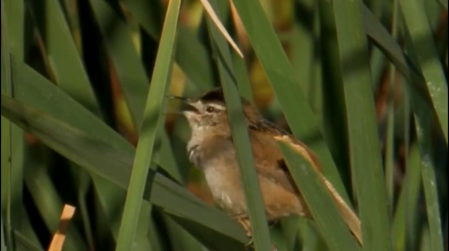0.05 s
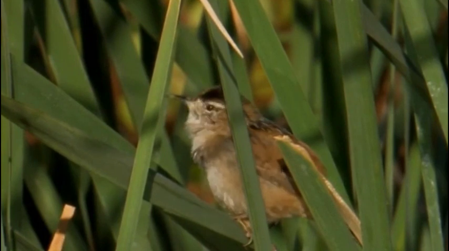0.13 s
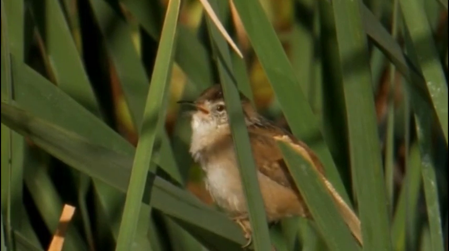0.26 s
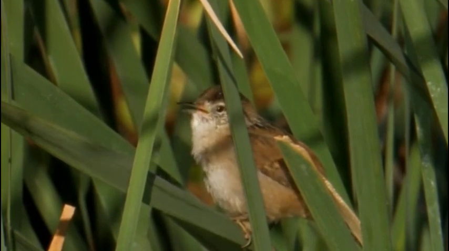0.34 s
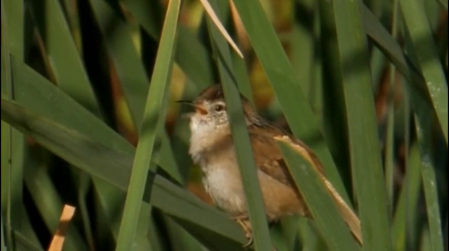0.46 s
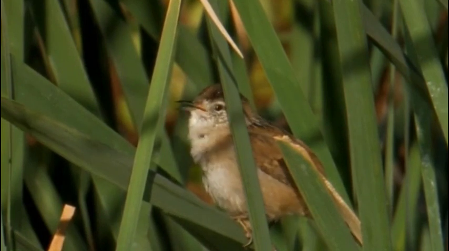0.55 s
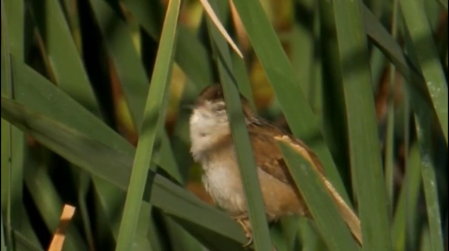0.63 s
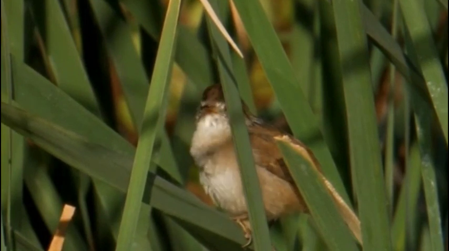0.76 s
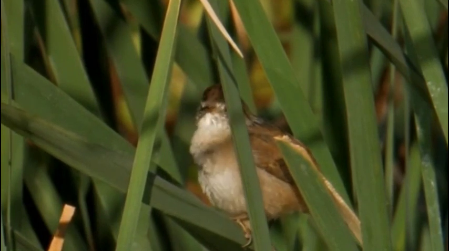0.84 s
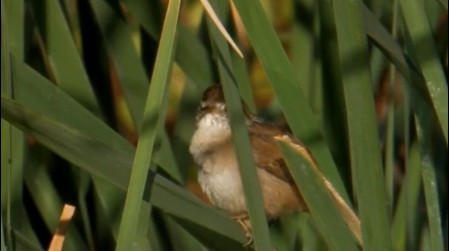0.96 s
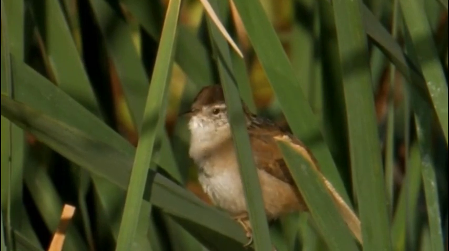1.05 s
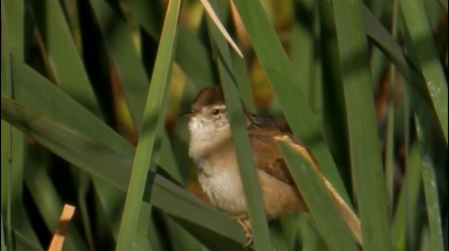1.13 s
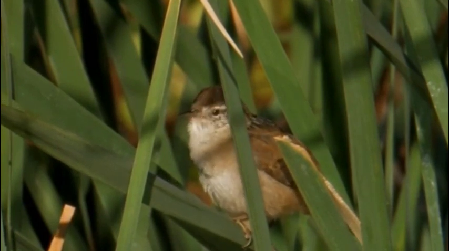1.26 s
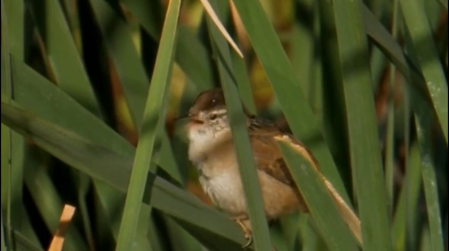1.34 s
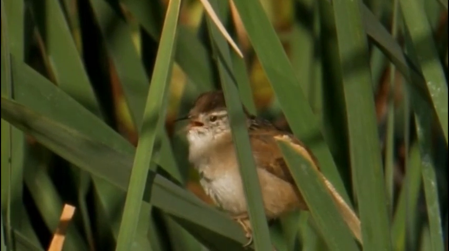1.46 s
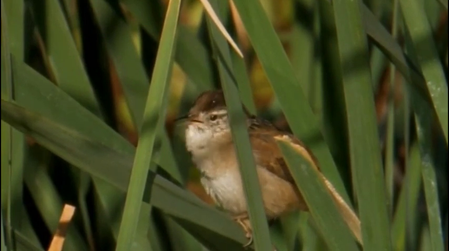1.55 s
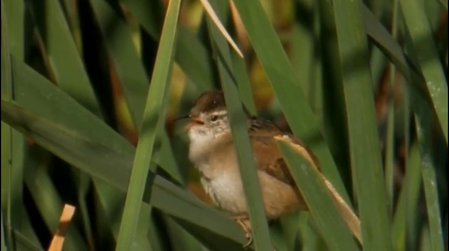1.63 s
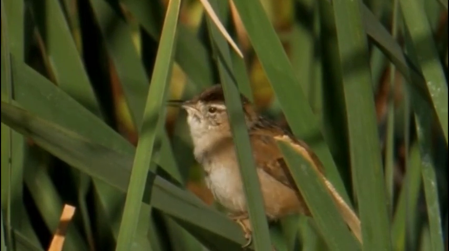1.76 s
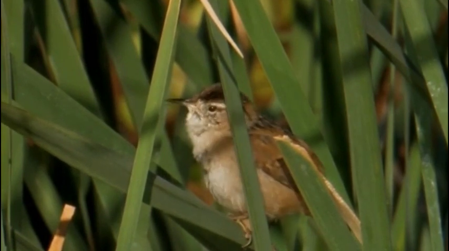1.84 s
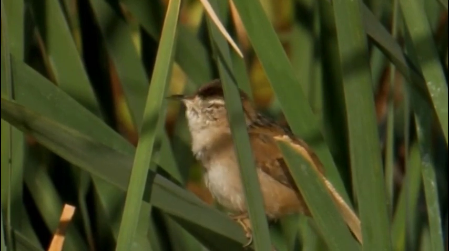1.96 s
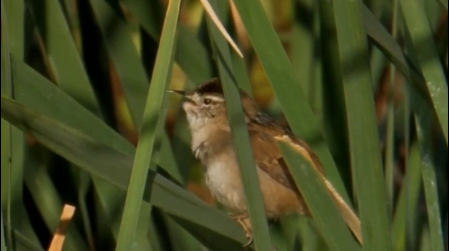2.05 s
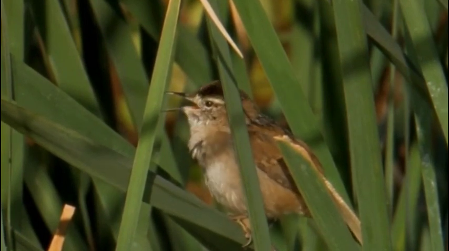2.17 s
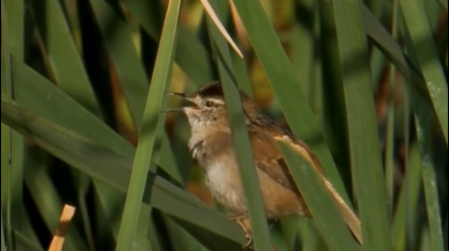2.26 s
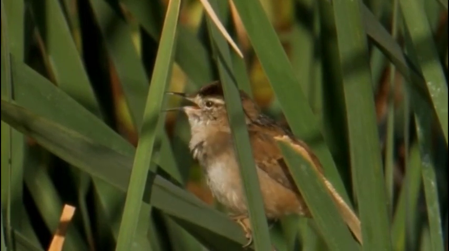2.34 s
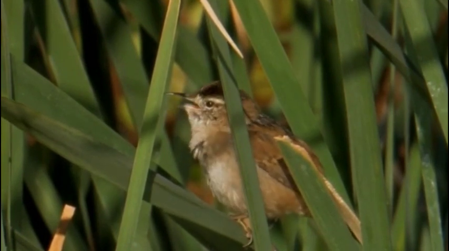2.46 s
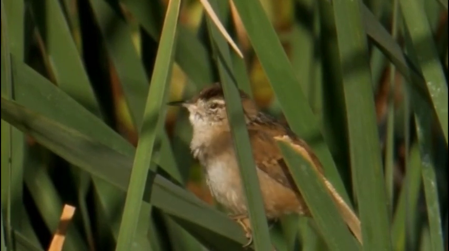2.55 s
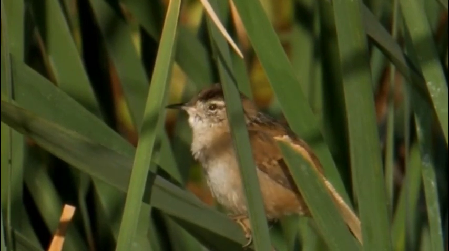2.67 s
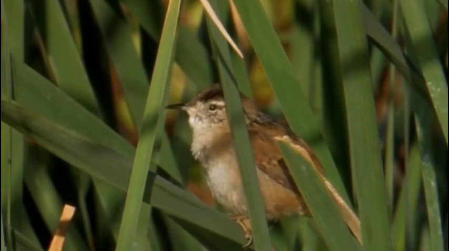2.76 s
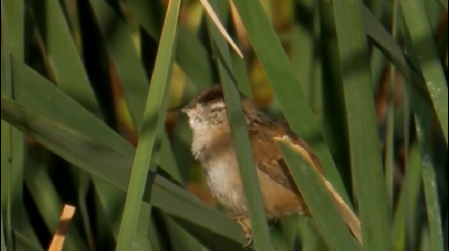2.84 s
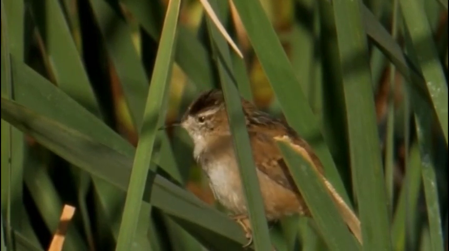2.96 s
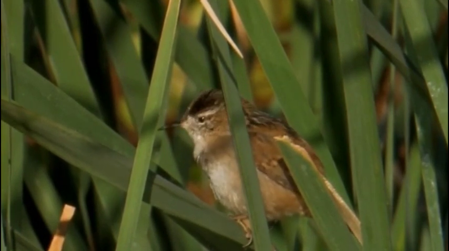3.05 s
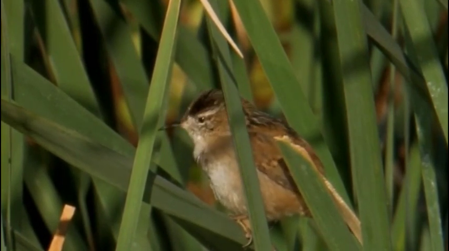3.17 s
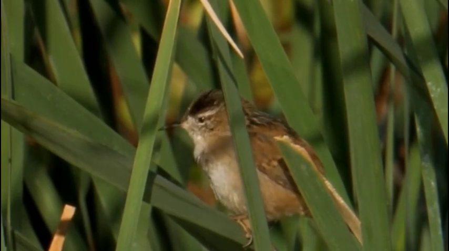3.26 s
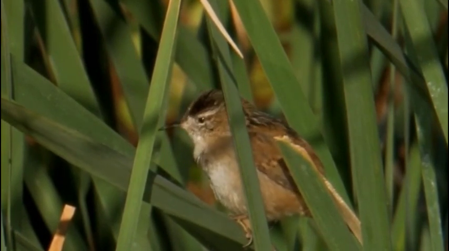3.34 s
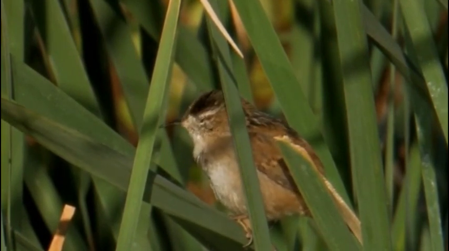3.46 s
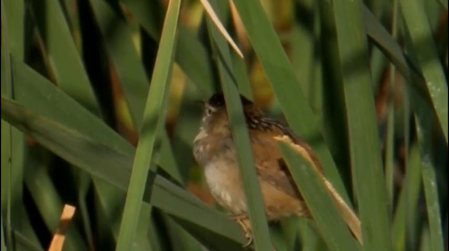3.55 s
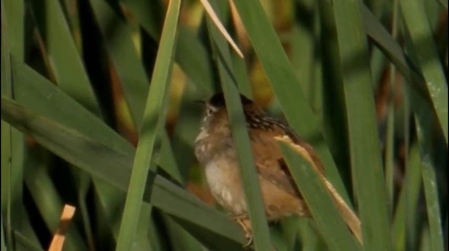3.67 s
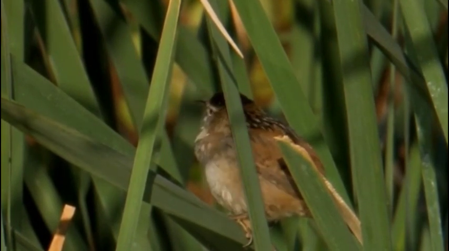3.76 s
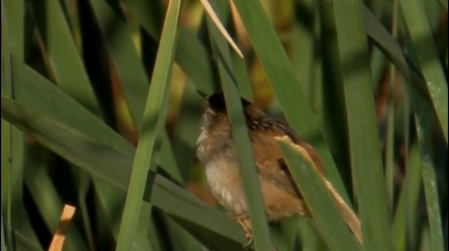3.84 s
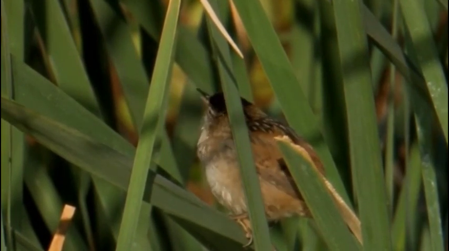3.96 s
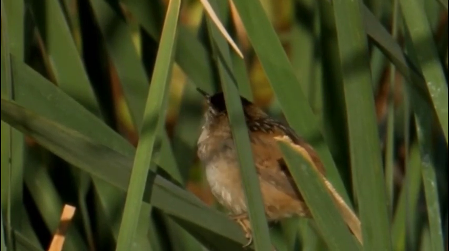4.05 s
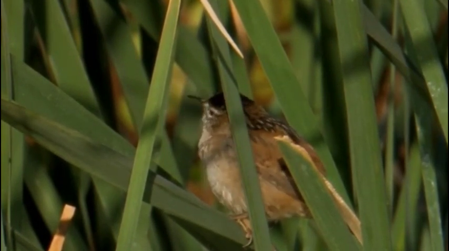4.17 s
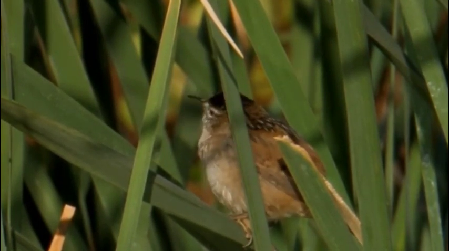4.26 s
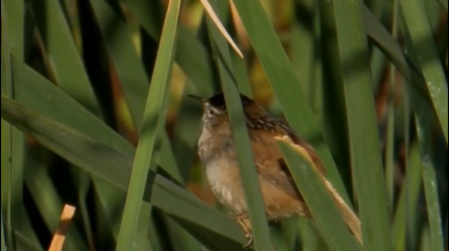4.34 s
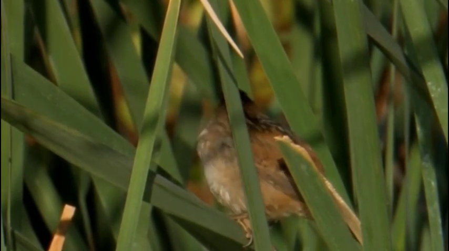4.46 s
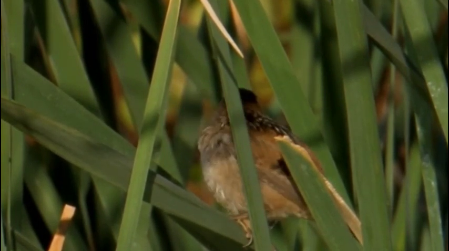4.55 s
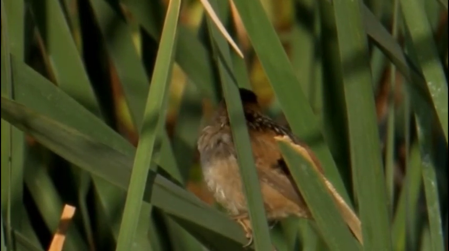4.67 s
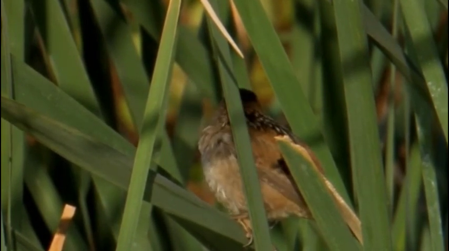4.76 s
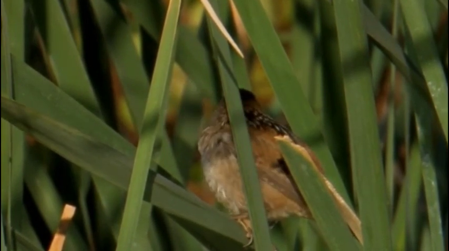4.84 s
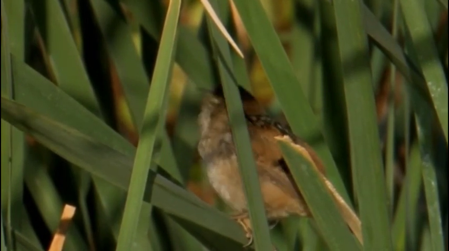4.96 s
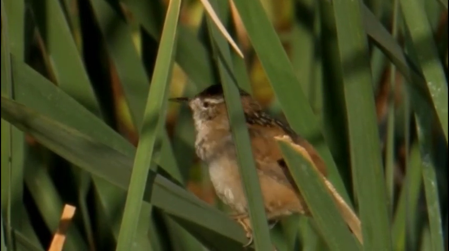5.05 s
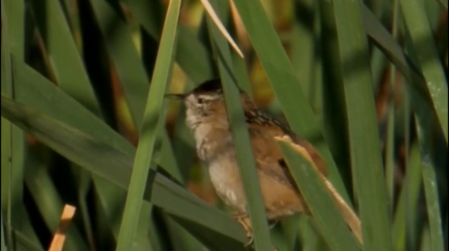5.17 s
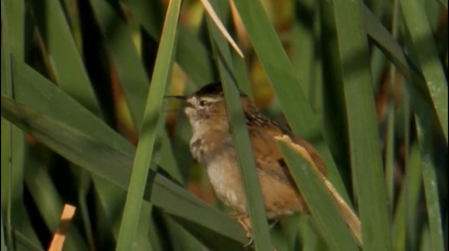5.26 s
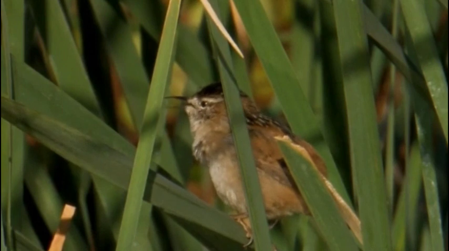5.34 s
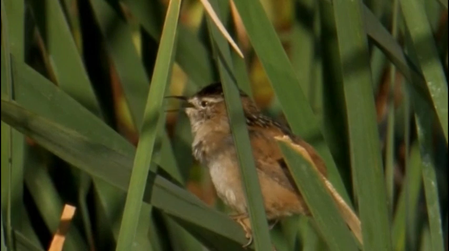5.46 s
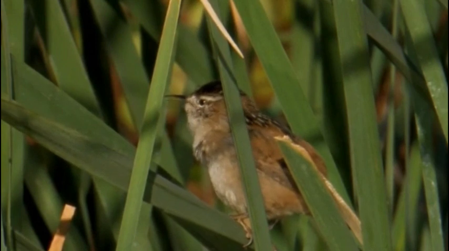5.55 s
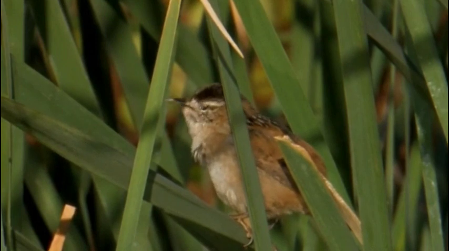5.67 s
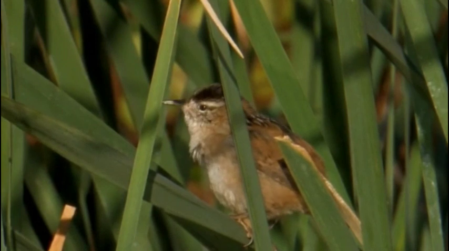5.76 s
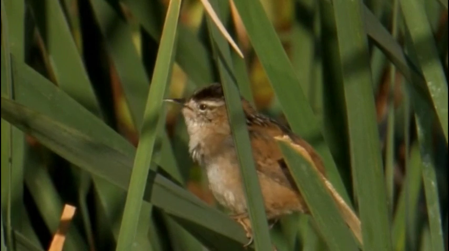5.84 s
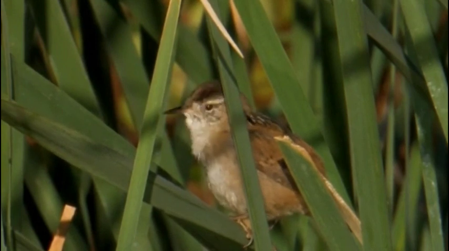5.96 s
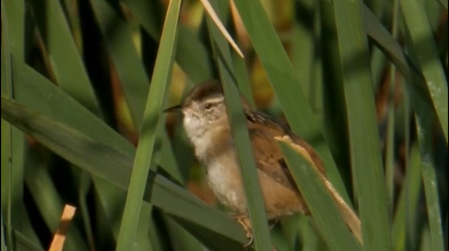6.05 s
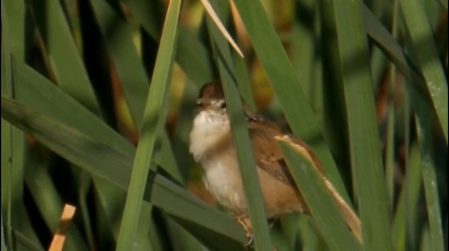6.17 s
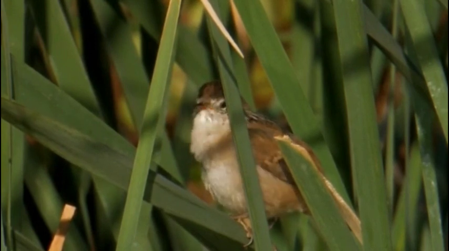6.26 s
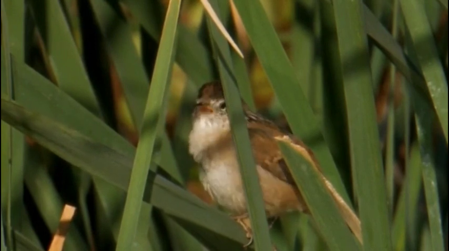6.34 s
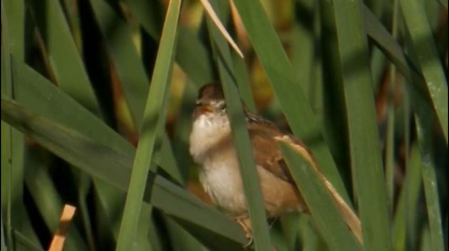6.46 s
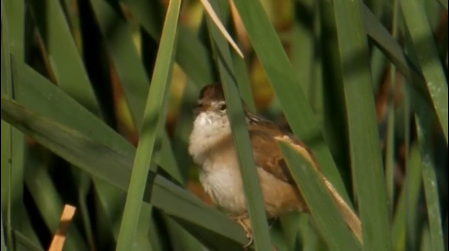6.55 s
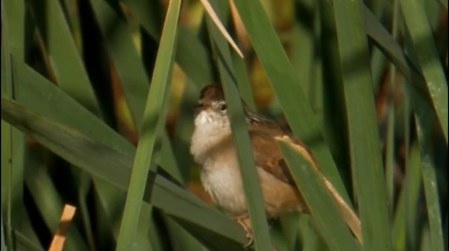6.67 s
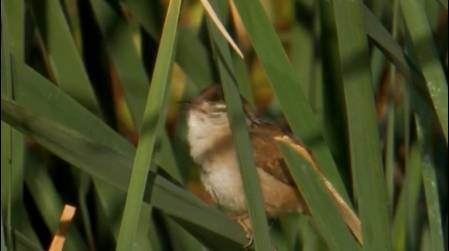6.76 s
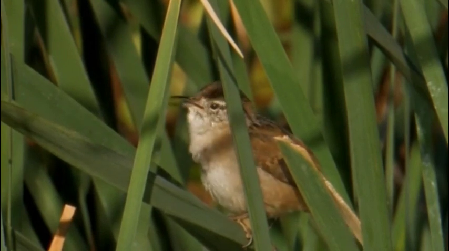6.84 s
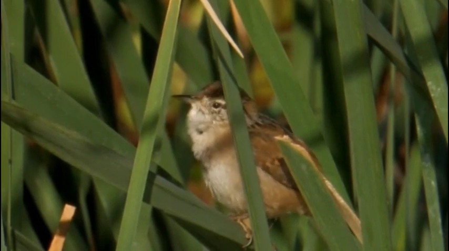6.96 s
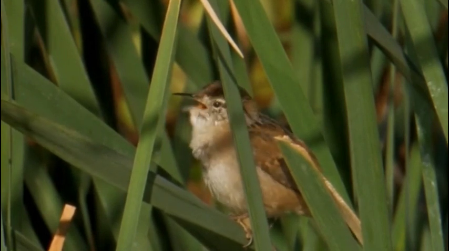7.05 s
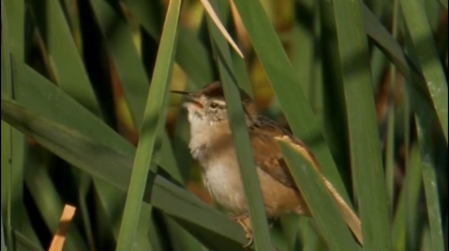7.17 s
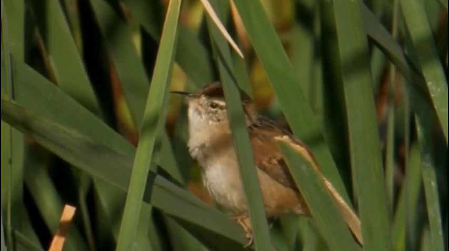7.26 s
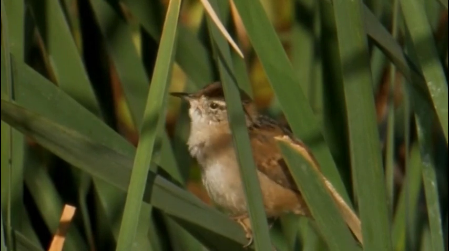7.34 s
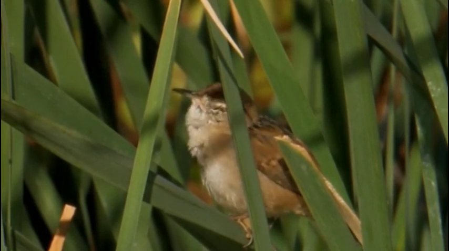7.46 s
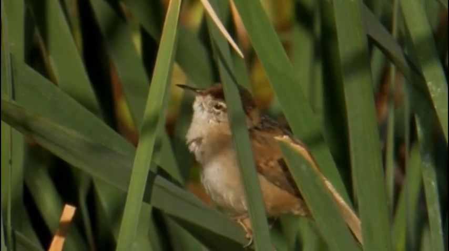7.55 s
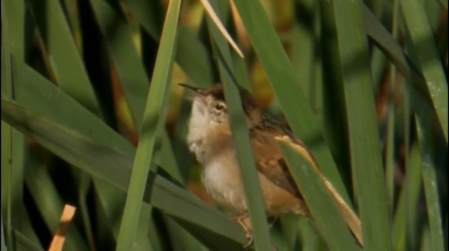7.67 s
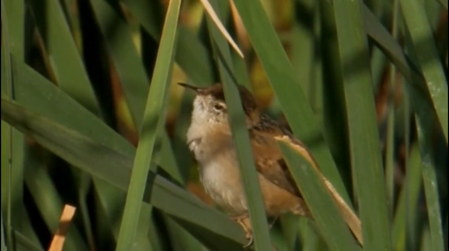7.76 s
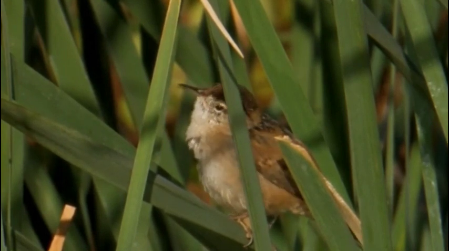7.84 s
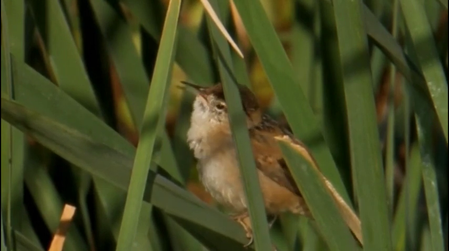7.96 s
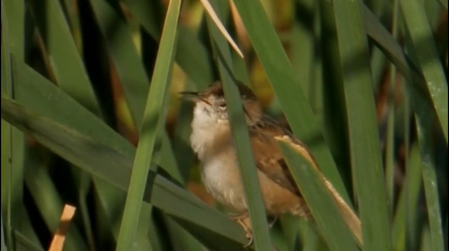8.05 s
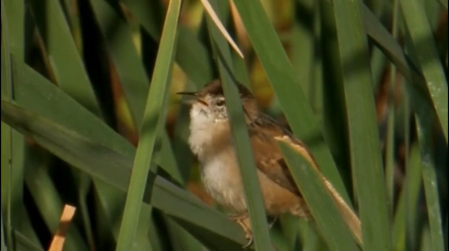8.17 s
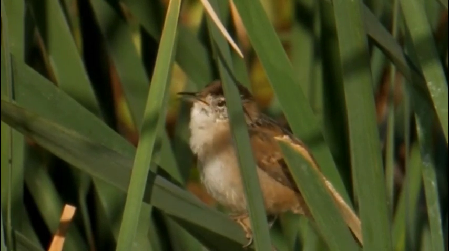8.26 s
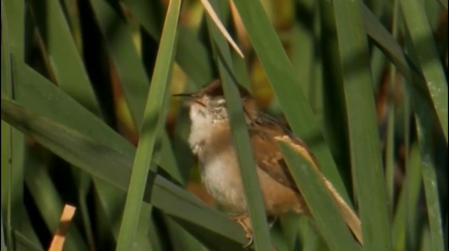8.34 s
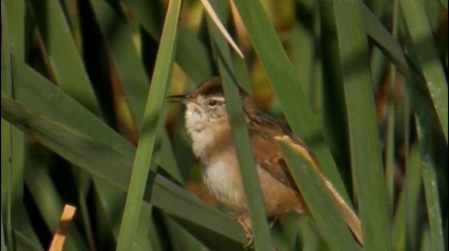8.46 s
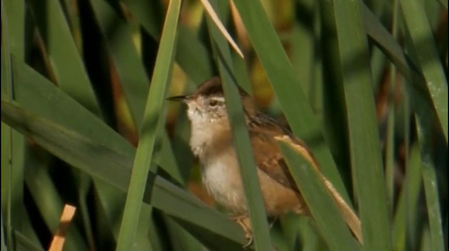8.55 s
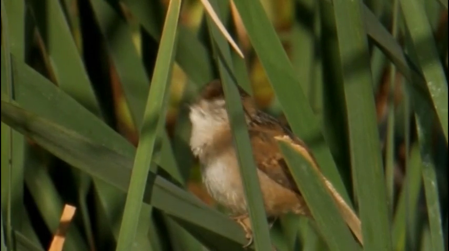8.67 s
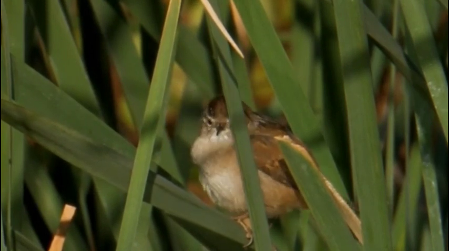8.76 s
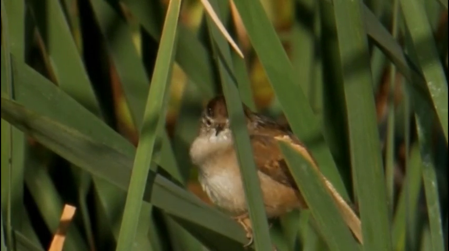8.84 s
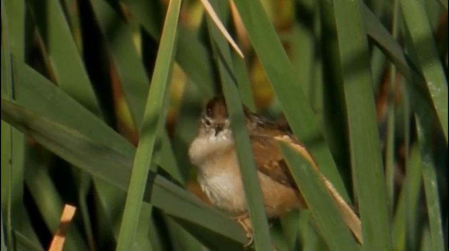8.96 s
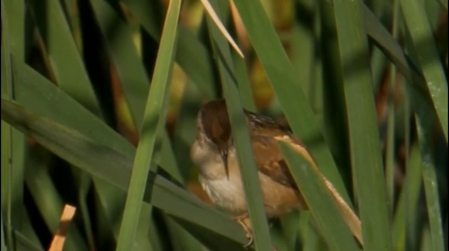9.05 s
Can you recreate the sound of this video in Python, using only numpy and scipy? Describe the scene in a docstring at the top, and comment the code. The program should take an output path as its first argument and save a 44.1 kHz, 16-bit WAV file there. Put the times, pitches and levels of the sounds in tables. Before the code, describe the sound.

A small wren sings close by in dense reeds. Sharp clicking chips lead into a fast trill of bright arched whistles with dry knocks between, then more chips and a run of harsh buzzes, about ten per second. After a pause of three seconds the same song returns. Fainter birds chirp, tick and rasp farther off over a deep intermittent hum, distant rumble and thin hiss. Outdoor microphone, bird centred, short scattered echoes from the stems.

```python
"""A marsh wren in cattails sings one song twice: chips, a trill of arched whistles and knocks, more chips,
then a trill of harsh buzzes. Whistles are gliding sines; rasps and buzzes are membrane pulses ringing in
resonances. The reeds scatter each note as filtered random echoes. Other birds chirp, tick and rasp farther
off, made of sines and pulses, over a hum of wavering sines and a distant rumble and hiss of shaped noise."""
import sys
import numpy as np
from scipy import signal
from scipy.fft import rfft, irfft, next_fast_len
from scipy.io import wavfile
from scipy.ndimage import uniform_filter1d, map_coordinates

SR = 44100
rng = np.random.default_rng(int(sys.argv[2]) if len(sys.argv) > 2 else 0)


def generate_wav(sig):
    """Save sig (samples, or channels by samples) to the path in sys.argv[1] as 16-bit PCM at SR."""
    pcm = np.round(np.clip(np.atleast_2d(sig).T, -1, 1) * 32767).astype(np.int16)
    wavfile.write(sys.argv[1], SR, pcm)


N = 401751

CHIRP_RISE_S, CHIRP_DROP_S = 0.026, 0.0118


def gain_of(db):
    """Decibel law: twenty decibels are a factor of ten in amplitude."""
    return 10 ** (np.asarray(db) / 20)


def evened(x):
    """Power normalisation: scales to rms 1."""
    return x / np.sqrt(np.mean(x ** 2) + 1e-20)


def read(points, hz):
    """Interpolation on a log-frequency axis, which resembles the ear's pitch scale."""
    f, value = np.transpose(points)
    return np.interp(np.log(hz + 1), np.log(f + 1), value)


def add(mix, s, sound):
    """Superposition: adds a sound in place at time s, cutting whatever falls outside the mix."""
    at = round(s * SR)
    sound = sound[max(-at, 0):]
    part = mix[max(at, 0):][:len(sound)]
    part += sound[:len(part)]


def wander(count, hz):
    """Band-limited random modulation: a smooth curve through about hz random values a second."""
    at = np.arange(count) * hz / SR
    values = rng.standard_normal(int(count * hz / SR) + 4)
    return map_coordinates(values, [at + 1], order=2, mode="nearest")


def colour(x, points):
    """Linear filtering: multiplies the spectrum by a zero-phase gain curve."""
    size = next_fast_len(N + 4096)
    gain = gain_of(read(points, np.fft.rfftfreq(size, 1 / SR)))
    return irfft(rfft(x, size) * gain, size)[:N]


def resonate(x, hz, width):
    """Heterodyned one-pole resonance of peak gain 1 whose centre follows the curve hz."""
    turn = np.exp(2j * np.pi * np.cumsum(hz * np.ones(len(x))) / SR)
    r = np.exp(-np.pi * width / SR)
    at_baseband = signal.lfilter([1 - r], [1, -r], x / turn)
    return 2 * (turn * at_baseband).real


def steadied(x, size):
    """Automatic level: divides by the local power over size samples, towards that of a unit sine."""
    power = abs(uniform_filter1d(uniform_filter1d(x ** 2, size=size), size=size))
    return x / np.sqrt(2 * (power + 0.031 * power.mean()) + 1e-18)


def ease(t, start, length):
    """Raised-cosine transition from 0 to 1 over length seconds."""
    return 0.5 - 0.5 * np.cos(np.pi * np.clip((t - start) / length, 0, 1))


def envelope(t, attack, release):
    """Amplitude envelope: attack, hold, release."""
    return ease(t, 0, attack) * ease(t[-1] - t, 0, release)


def pulses(rate, jitter, shimmer_db, limp):
    """Relaxation pulses: uneven slaps of the syrinx membranes; limp weakens every other one."""
    count = len(rate)
    uneven_rate = rate * (1 + jitter * wander(count, 700))
    cycle = np.floor(np.cumsum(uneven_rate) / SR + 0.7)
    slaps = np.diff(cycle, prepend=0) * (1 - limp * (cycle % 2))
    return slaps * gain_of(shimmer_db * np.clip(rng.standard_normal(count), -2, 2))


def syllable(hz, rasp, overtone_db, pulse_hz=880, width_hz=1600, jitter=0.12, third_db=-14, skirt_db=-20):
    """Source-filter voice: a whistle gives way to pulses ringing at the same pitch as the rasp rises."""
    count, rasp = len(hz), np.clip(rasp, 0, 1)
    phase = 2 * np.pi * np.cumsum(hz * (1 + 0.0067 * wander(count, 430))) / SR
    # third_db is relative to the second harmonic
    overtones = np.sin(2 * phase) + gain_of(third_db) * np.sin(3 * phase)
    whistle = np.sin(phase) + gain_of(overtone_db) * overtones
    slaps = pulses(np.full(count, pulse_hz), jitter, 3.5, 0)
    ring = resonate(resonate(slaps, hz, width_hz), hz, width_hz)
    # the slaps also stir the low end of the windpipe
    windpipe = resonate(resonate(slaps, 1700, width_hz), 1700, width_hz)
    rattle = steadied(ring + gain_of(skirt_db) * windpipe, size=90)
    return np.sqrt(1 - rasp) * whistle + np.sqrt(rasp) * rattle


def note(length, from_hz, to_hz, db, fade_db, rasp, **voice):
    """Frequency glide: one puff of air whose pitch slides one way while its level tilts."""
    # the lower a note, the stronger its overtones: pitch_hz, overtone_db
    overtone_curve = [(1500, -16), (2300, -28), (5000, -30)]
    attack, release = 0.2, 0.24  # shares of the length
    glide_bend = 1.153  # above 1 the glide gathers speed
    t = np.arange(0, length, 1 / SR)
    hz = from_hz + (to_hz - from_hz) * (t / length) ** glide_bend
    tilt_db = fade_db * (t / length - 0.5)
    loudness = gain_of(db + tilt_db) * envelope(t, attack * length, release * length)
    return loudness * syllable(hz, rasp, read(overtone_curve, hz), **voice)


def arch():
    """Two-voice phonation: one side of the syrinx whistles an arch while the other grates above it."""
    # the throat favours the whistle's overtone near 6 kHz: pitch_hz, overtone_db
    overtone_curve = [(2400, 4), (3100, 13), (3900, 4.5), (4400, -2.5)]
    low_hz, leap_hz, sag_hz = 2386, 2038, 609
    length_s, leap_s, sag_start_s, sag_s = 0.047, 0.0112, 0.013, 0.021
    t = np.arange(0, length_s, 1 / SR)
    leap, sag = ease(t, 0, leap_s), ease(t, sag_start_s, sag_s)
    # the whistle leaps up, holds, then sags; it is weaker before the leap
    hz = low_hz + leap_hz * leap - sag_hz * sag
    whistle_db = -17 - 7.5 * (1 - leap)
    whistle = syllable(hz, rasp=0.048, overtone_db=read(overtone_curve, hz), third_db=-12.5)
    whistle = gain_of(whistle_db) * whistle * envelope(t, attack=0.0018, release=0.017)
    # the grating side starts with an accent and swells as the whistle sags
    accent_db, accent_s, swell_db = 7.5, 0.015, 11.5
    grate_db = -23.5 + accent_db * np.exp(-t / accent_s) + swell_db * sag
    grate = syllable(np.full(len(t), 7120), rasp=0.85, overtone_db=-30,
                     pulse_hz=1306, width_hz=2750, jitter=0.45, skirt_db=-17)
    grate = gain_of(grate_db) * grate * envelope(t, attack=0.0068, release=0.015)
    return whistle + grate


def knock():
    """Impulsive excitation: a short burst of uneven slaps at one pitch."""
    return note(0.015, from_hz=3174, to_hz=3174, db=-13.5, fade_db=-8.5, rasp=0.97,
                pulse_hz=913, width_hz=1770, jitter=0.26, skirt_db=-11)


def buzz(jitter=0.06, shimmer_db=3, lower_width_hz=1100, upper_width_hz=1600):
    """Formant synthesis: pulses slow and limp as the beak closes; the upper resonance sinks and fades."""
    # fixed resonances of the throat: centre_hz, width_hz, level_db
    throat = [(1550, 900, -12), (2400, 1000, -13), (4000, 900, -8), (11000, 1500, -24)]
    length_s, close_start_s, close_s = 0.085, 0.027, 0.026
    t = np.arange(0, length_s, 1 / SR)
    closed = ease(t, close_start_s, close_s)

    def closing(when_open, when_closed):
        """Linear interpolation between the open and the closed beak."""
        return when_open + (when_closed - when_open) * closed

    # a slow start and a waver, as shares of the pulse rate in Hz
    scoop, scoop_s, waver = 0.14, 0.026, 0.025
    rate = closing(838, 669) * (1 - scoop * (1 - ease(t, 0, scoop_s)) + waver * wander(len(t), 35))
    # limp is the weakening of every other pulse, 0-1
    limp = np.clip(closing(0.14, 0.55) + 0.33 * wander(len(t), 77), 0, 1)
    drive = evened(pulses(rate, jitter, shimmer_db, limp))
    drive = drive + 0.3 * rng.standard_normal(len(drive))  # breath noise

    # the buzz and its upper resonance surge while the beak is closing
    surge_db = 2 * np.sin(np.pi * closed)
    upper_fade_db, fade_start_s, fade_s = -52.5, 0.041, 0.0072
    upper_db = surge_db - 2 + upper_fade_db * ease(t, fade_start_s, fade_s)
    lower_hz, upper_hz = closing(5150, 4790), closing(6920, 5772)
    modes = throat + [(lower_hz, lower_width_hz, 0), (upper_hz, upper_width_hz, upper_db)]
    ringing = sum(gain_of(db) * resonate(resonate(drive, hz, width), hz, width) for hz, width, db in modes)
    loudness = gain_of(closing(-7.5, -11.5) + surge_db) * envelope(t, attack=0.018, release=0.014)
    sound = loudness * steadied(ringing, size=200)
    # a squeak as the buzz takes hold
    add(sound, 0.008, note(0.007, from_hz=7360, to_hz=7360, db=-13.5, fade_db=0, rasp=0.16))
    return sound


def beats(trill, count):
    """Quadratic timing: beat number, time and progress 0-1 through a slowing trill."""
    start_s, period_s, lag_s = trill
    return [(k, start_s + period_s * k + lag_s * k ** 2, k / (count - 1)) for k in range(count)]


def wren():
    """Source and radiation: chips, a swelling whistle trill and a tiring buzz trill, shaped by the beak."""
    # when each song begins: start_s
    song_starts = [0.0, 5.4055]
    # chips that lead into each trill, start counted from the song's beginning:
    # start_s, length_s, from_hz, to_hz, level_db (before the beak), tilt_db over the note, rasp 0-1
    chips = [(-.0272, .0045, 3300, 3100, -12.5, 4, 1), (-.023, .0068, 4150, 2000, -8.5, 2.5, .03),
             (-.0145, 0.017, 1625, 1530, -23, -11, 0.4), (0.173, 0.0047, 3220, 3060, -17, 1.5, 0.96),
             (0.1779, 0.0081, 4310, 1830, -11, 10.5, 0.03), (.188, 0.012, 1530, 1430, -21, -12, 0.07),
             (0.2829, 0.0024, 4800, 4500, -7.5, 0, 1), (0.2867, .004, 4410, 3430, -10.5, 7, 0.34),
             (0.293, .029, 2100, 2433, -11, 3, 0.01), (1.2112, 0.0061, 5370, 4760, -4.5, -4, 0.1),
             (1.2116, 0.011, 4170, 3160, -18.5, -1.5, 0.7), (1.21, 0.026, 2730, 1626, -15.5, -3.5, 0.37),
             (1.3703, 0.0049, 3350, 3200, -13, -1, 0.96), (1.3785, .0075, 3110, 2950, -11.5, 0, .02),
             (1.394, 0.017, 1563, 1480, -18.5, -9, 0.04), (1.5083, 0.0065, 5380, 4980, -5.5, -4, 0.35),
             (1.5084, 0.013, 4200, 3180, -16, 1.5, 0.76), (1.506, 0.027, 2760, 1578, -16.5, -4.5, 0.4),
             (1.5806, 0.017, 4830, 3200, -14.5, -13, 1), (1.595, 0.0034, 2540, 2300, -11, 3.5, 0.2),
             (1.6035, 0.0041, 3324, 3000, -18, 1.5, 0.05), (1.611, .0045, 3255, 2885, -19, -0.5, 0)]
    # what the beak lets out: frequency_hz, gain_db
    beak = [(300, -41.5), (700, -16), (1400, -7), (3000, 3), (7800, -3.5), (9000, -10.5), (9900, -14.5),
            (11700, -17), (13500, -19.5)]
    # start (s into the song), first beat (s), lag (s per beat squared)
    whistle_trill, whistle_beats = (0.3452, 0.1005, 0.00055), 7
    buzz_trill, buzz_beats = (1.631, 0.1046, 0.00033), 8
    knock_delay_s, knock_lag_s = 0.062, 0.0013  # the delay grows with every beat
    start_db, swell_db, tire_db = -0.5, 3.5, -1.9  # swell and tiring over a whole trill
    out = np.zeros(N)
    for begin in song_starts:
        for s, *shape in chips:
            add(out, begin + s, note(*shape, pulse_hz=1002, width_hz=1390, jitter=0.084, skirt_db=-13.5))
        for k, s, progress in beats(whistle_trill, whistle_beats):
            effort = gain_of(start_db + swell_db * progress ** 2)
            add(out, begin + s, effort * arch())
            if k < whistle_beats - 1:  # knocks fall only between whistles
                add(out, begin + s + knock_delay_s + knock_lag_s * k, effort * knock())
        for k, s, progress in beats(buzz_trill, buzz_beats):
            add(out, begin + s, gain_of(tire_db * progress ** 2) * buzz())
    return colour(out, beak)


def reeds(x, spread=0.048):
    """Multiple scattering: many stems return a short random tail, nearly alike in both ears."""
    # scattered sound: frequency_hz, level_db
    scatter_db = [(1000, -14), (2400, -21.5), (4000, -17), (5200, -13), (7800, -14), (12000, -11.5)]
    # time for the tail to fall by 60 dB: frequency_hz, t60_s
    scatter_t60 = [(1000, 0.25), (4000, 0.13), (8000, 0.18), (13000, .12)]
    count = SR // 2
    sample = np.arange(count)
    sparse = rng.random((3, count)) < 0.12
    taps = rng.standard_normal((3, count)) * sparse * (sample > 90)
    taps = evened(taps) * (1 + 1.6 * np.exp(-sample / (0.023 * SR)))  # the nearest stems answer loudest
    hz, t, z = signal.stft(taps, SR, nperseg=256)
    t60 = np.maximum(read(scatter_t60, hz), 0.02)[:, None]
    decay = np.exp(-np.log(1000) * t / t60)
    # offsets the greater energy of a longer decay
    balance = np.sqrt(2 * np.log(1000) / (t60 * SR))
    shape = gain_of(read(scatter_db, hz)[:, None]) * decay * balance
    tail = signal.istft(z * shape, SR, nperseg=256)[1]
    ears = tail[:1] + spread * tail[1:]  # a shared tail and a little of each ear's own
    return signal.oaconvolve(x[None], ears, axes=1)[:, :N]


def air(patchy_db=2.5, rumble_ref_db=-40):
    """Shaped stochastic noise: a distant rumble swells and sinks under a thin hiss, in partly coherent stereo."""
    # relative noise spectrum: frequency_hz, density_db per Hz
    spectrum = [(15, -56), (25, -23.5), (87, -5), (147, -5.5), (722, -29), (781, -31), (1190, -33),
                (1560, -31.5), (1870, -32), (2640, -37), (4140, -41), (12900, -46), (14000, -65)]
    # course of the rumble, taken relative to rumble_ref_db: time_s, level_db
    rumble = [(0, -46.5), (3.25, -42.5), (3.45, -52.5), (3.57, -42), (4.67, -37.5), (7, -43), (8, -44.5),
              (9.11, -47.5)]
    # left-right likeness: frequency_hz, coherence (1 = identical)
    likeness = [(60, 1), (150, 0.99), (370, 0.97), (930, 0.85), (2340, 0.95), (5830, 0.54), (14600, 0.0069)]
    frames, hz = N // 512 + 5, np.fft.rfftfreq(2048, 1 / SR)
    a, b, c, d, patches = rng.standard_normal((5, frames, len(hz)))
    patches = evened(uniform_filter1d(uniform_filter1d(patches, size=8, axis=0), size=12, axis=1))
    same = np.clip(read(likeness, hz), -1, 1)
    left = a + 1j * b
    right = same * left + np.sqrt(1 - same ** 2) * (c + 1j * d)
    z = np.array([left, right]) * gain_of(read(spectrum, hz) + patchy_db * patches)

    def to_sound(frames_of_noise):
        """Overlap-add: turns spectral frames into a waveform."""
        return signal.istft(frames_of_noise, nperseg=2048, noverlap=1536, time_axis=-2, freq_axis=-1)[1]

    swell_db = np.interp(np.arange(frames) * 512 / SR, *np.transpose(rumble)) - rumble_ref_db
    share = read([(300, 0.9), (900, 0.0), (3000, 0.0), (6000, 0)], hz)  # only the lows swell
    steady = to_sound(z[0])  # the left ear without swells sets the reference level
    swelling = to_sound(z * gain_of(swell_db[:, None] * share))
    return gain_of(-40) * swelling[:, :N] / steady.std()


def hum():
    """Phase and amplitude modulation: a deep drone comes and goes, with a faint wavering tone above it."""
    # spells of the drone: start_s, end_s, level_db at the start
    spells = [(-.1, 3.06, -30), (5.26, 8.46, -29.5)]
    drone_hz, tone_hz, tone_db = 24.6, 149.7, -51
    fade_db_per_s, edge_s = -2.5, 0.054
    t = np.arange(N) / SR
    drone = np.sin(2 * np.pi * drone_hz * t + 0.4 * wander(N, 4.3)) * (1 + 0.34 * wander(N, 20))
    tone = np.sin(2 * np.pi * tone_hz * t + 0.39 * wander(N, 11)) * (1 + 0.44 * wander(N, 4.5))
    loudness = np.zeros(N)
    for start, end, db in spells:
        edges = ease(t, start, edge_s) * ease(end - t, 0, edge_s)
        loudness += gain_of(db + fade_db_per_s * (t - start)) * edges
    return loudness * drone + gain_of(tone_db) * evened(tone)


def tick(db):
    """Pulse excitation: dry slaps under a falling resonance, with no whistle."""
    return note(0.04, from_hz=3600, to_hz=2950, db=db, fade_db=-14, rasp=1.0,
                pulse_hz=880, width_hz=5700, jitter=0.2)


def chirp(peak_hz, db):
    """Parabolic frequency sweep: a whistle swells up to its peak and turns raspy as it drops away."""
    depth, edge_db = 0.36, -11.5  # depth as a share of the peak pitch; level at the edges
    t = np.arange(-CHIRP_RISE_S, CHIRP_DROP_S, 1 / SR)
    away = np.where(t < 0, t / CHIRP_RISE_S, t / CHIRP_DROP_S) ** 2  # 0 at the peak, 1 at the edges
    rasp = 0.08 + 0.5 * ease(t, 0, CHIRP_DROP_S)
    voice = syllable(peak_hz * (1 - depth * away), rasp, overtone_db=-27, pulse_hz=704)
    return gain_of(db + edge_db * away) * envelope(t - t[0], attack=0.0051, release=0.0022) * voice


def neighbours():
    """Distance filtering: chirps, dry ticks and notes of other birds, dulled in the treble."""
    # rise-and-drop whistles: peak_s, peak_hz, level_db (before the distance filter)
    chirps = [(0.113, 2420, -31.5), (2.767, 2480, -31), (3.564, 2460, -42), (3.755, 2474, -37),
              (3.971, 2790, -47), (4.188, 2880, -50), (4.428, 2490, -37), (4.516, 2590, -33.5),
              (4.763, 2860, -48)]
    # dry ticks: start_s, level_db (before the distance filter)
    ticks = [(0.054, -38), (0.118, -37.5), (1.136, -42.5), (2.593, -43.5), (3.15, -54), (3.345, -42),
             (4.529, -47.5), (4.979, -44), (6.54, -46)]
    # gliding notes: start_s, length_s, from_hz, to_hz,
    # level_db (before the distance filter), tilt_db over the note, rasp 0-1
    calls = [(8.043, 0.056, 2510, 2700, -54, 0, .2), (8.42, 0.011, 2920, 2800, -20.5, 4, 0.77),
             (8.438, 0.013, 2230, 1870, -21.5, -7, 0), (8.591, 0.1, 2200, 2670, -55, 11, 0.4),
             (8.589, 0.05, 3150, 3660, -55, 0, 0.3), (8.677, .016, 2140, 2030, -44, -4, 0.6),
             (8.702, 0.042, 1880, 1910, -47, 5, 0.3), (8.739, 0.0088, 1574, 1760, -28, -4, 0.1),
             (8.7463, 0.0042, 2530, 2950, -16, 5, 0.27), (8.752, 0.0047, 2910, 2340, -12.5, 4, 0.05)]
    out = np.zeros(N)
    for s, db in ticks:
        add(out, s, tick(db))
    for s, hz, db in chirps:
        add(out, s - CHIRP_RISE_S, chirp(hz, db))
    for s, *shape in calls:
        add(out, s, note(*shape, pulse_hz=917, width_hz=4300))
    # frequency_hz, gain_db
    return colour(out, [(400, -26.5), (1300, 4), (4500, -0.5), (8000, -14.5), (13000, -12)])


def far_rasps(droop=0.033, flutter=0.87):
    """Random frequency modulation: pitch shakes so fast that drawn-out notes blur into bands of hiss."""
    # start_s, length_s, pitch_hz, level_db, overtone_db, pitch_shake (share of the pitch)
    rasps = [(2.73, 0.29, 2040, -45.5, -5.5, 0.052), (8.135, 0.305, 2030, -46, -5, 0.0392),
             (7.86, .17, 1560, -47.5, -24, 0.046), (8.87, 0.17, 1500, -52, -34, 0.1),
             (3.7, 0.126, 1900, -48, -21.5, .25), (4.33, 0.25, 2400, -47.5, -21, 0.272),
             (4.76, 0.46, 2300, -53, -17, 0.087)]
    out = np.zeros(N)
    for s, length, hz, db, overtone_db, spread in rasps:
        count = int(length * SR)
        pitch = hz * (1 - droop * np.hanning(count) + spread * wander(count, 900))
        phase = 2 * np.pi * np.cumsum(pitch) / SR
        bands = np.sin(phase) + gain_of(overtone_db) * (np.sin(2 * phase) + np.sin(3 * phase))
        hiss = evened(resonate(resonate(rng.standard_normal(count), 4300, 2500), 4100, 2400))
        hiss = gain_of(overtone_db + 1.0) * hiss
        swell = signal.windows.tukey(count, 0.1) * np.minimum(0.14 + 3 * np.arange(count) / count, 1)
        fluttering = bands * (0.62 + flutter * wander(count, 300))
        add(out, s, gain_of(db) * swell * (fluttering + hiss))
    return out


def scene():
    """Direct and scattered sound: the wren straight ahead, other birds with a larger share of echo."""
    near, far = wren(), neighbours() + far_rasps()
    to_reeds = near + gain_of(2) * far  # the other birds are deeper in the reeds
    # each turn of a head stirs other echoes: a shifting blend of two independent tails
    turn = 1.5 * wander(N, 4)
    echoes = reeds(to_reeds * np.cos(turn)) + reeds(to_reeds * np.sin(turn))
    return near + far + echoes + air() + hum()


def record(dry):
    """Soft saturation rounds off the loudest peaks; a linear-phase low-pass then limits the band."""
    edge_hz, ceiling = 13800, 0.85
    rounded = dry / (1 + (dry / ceiling) ** 6) ** (1 / 6)
    low_pass = signal.firwin(255, edge_hz, window=("kaiser", 8), fs=SR)
    return signal.oaconvolve(rounded, low_pass[None], "same")


dry = scene()
out = record(dry)
generate_wav(out)
```